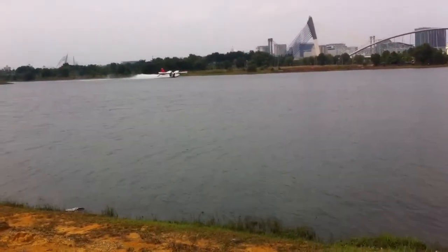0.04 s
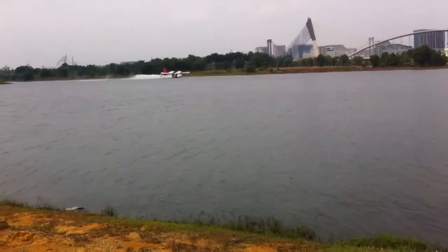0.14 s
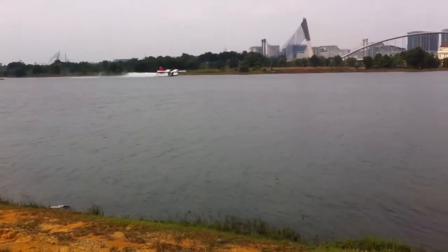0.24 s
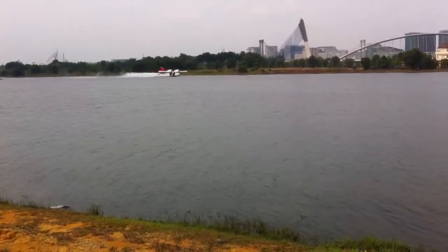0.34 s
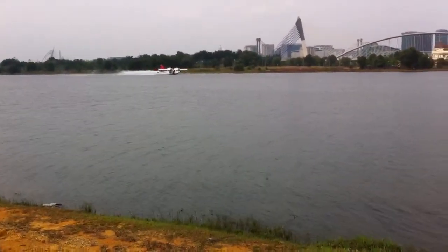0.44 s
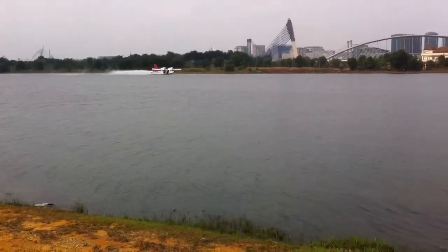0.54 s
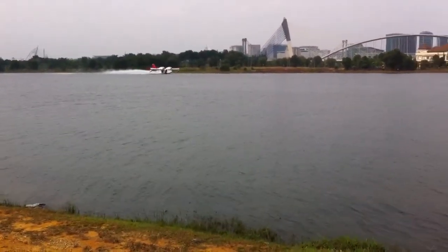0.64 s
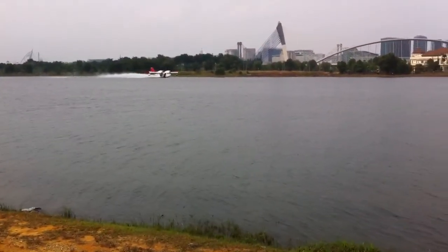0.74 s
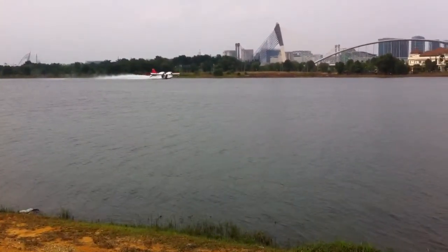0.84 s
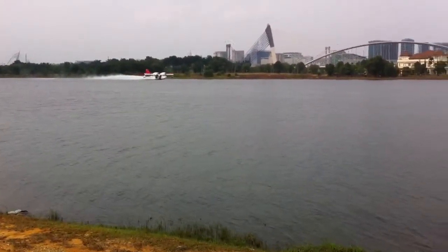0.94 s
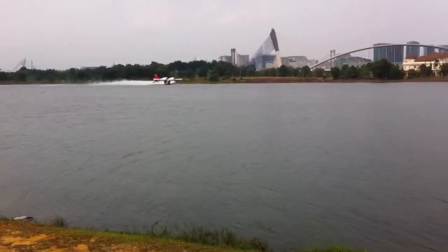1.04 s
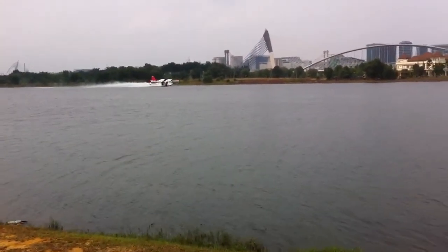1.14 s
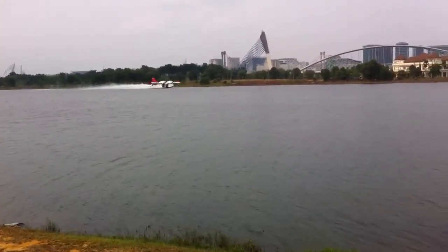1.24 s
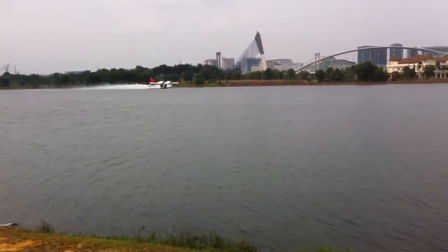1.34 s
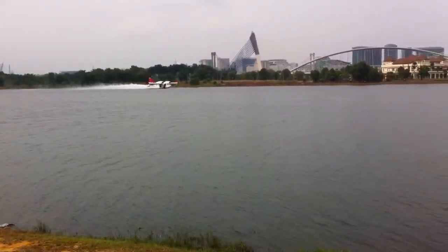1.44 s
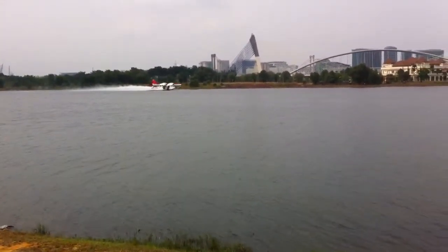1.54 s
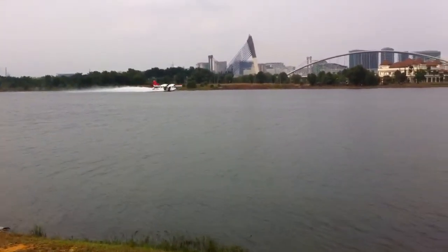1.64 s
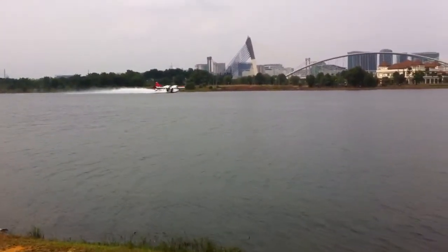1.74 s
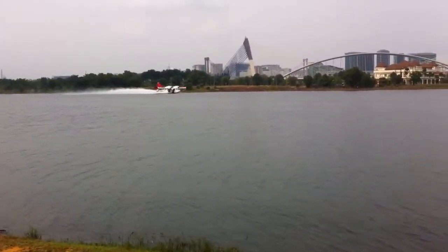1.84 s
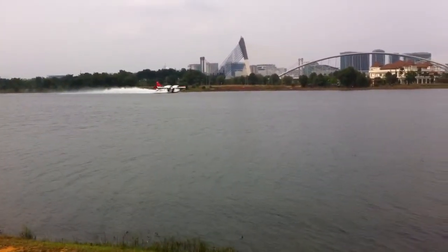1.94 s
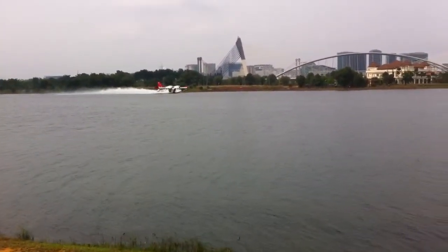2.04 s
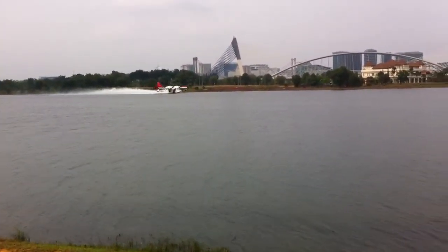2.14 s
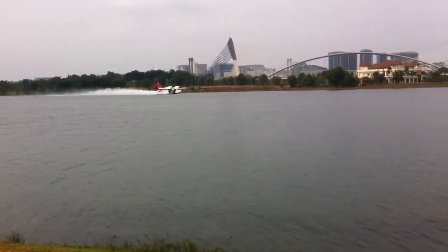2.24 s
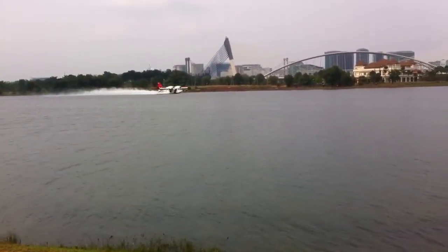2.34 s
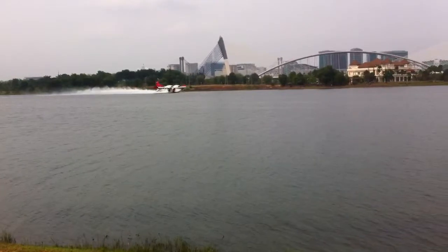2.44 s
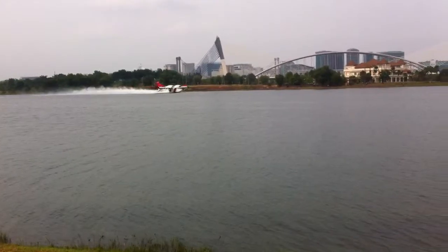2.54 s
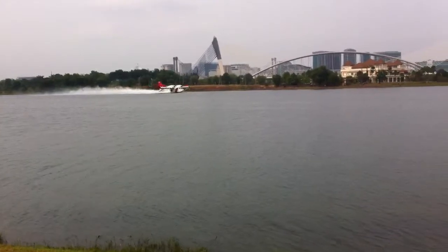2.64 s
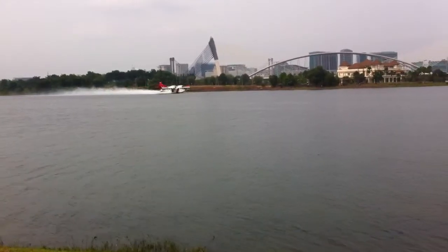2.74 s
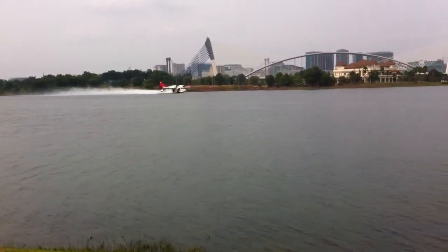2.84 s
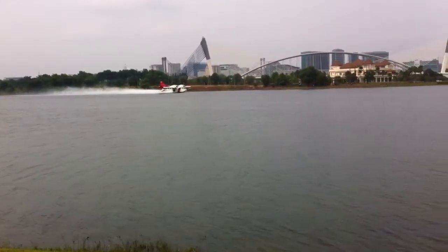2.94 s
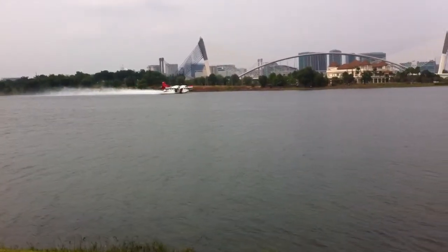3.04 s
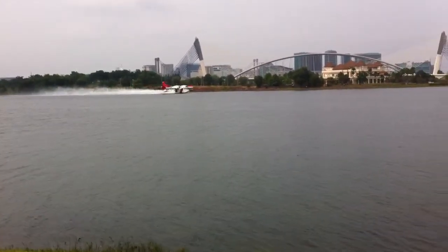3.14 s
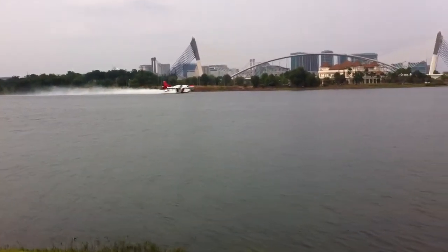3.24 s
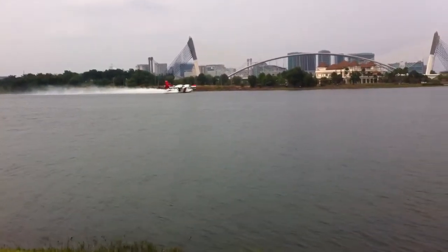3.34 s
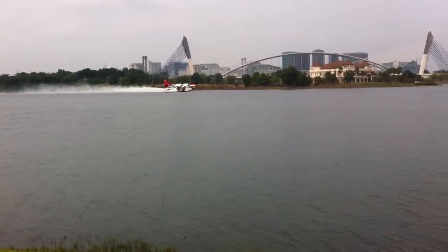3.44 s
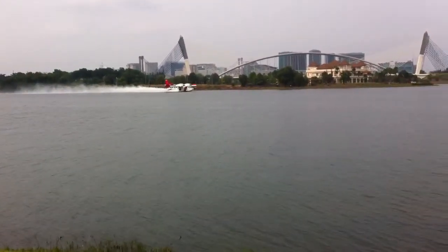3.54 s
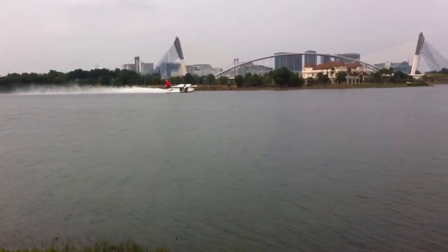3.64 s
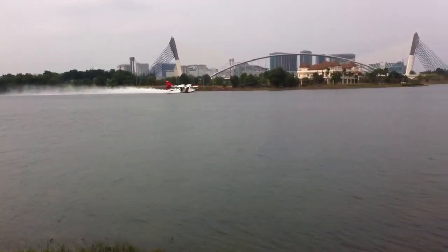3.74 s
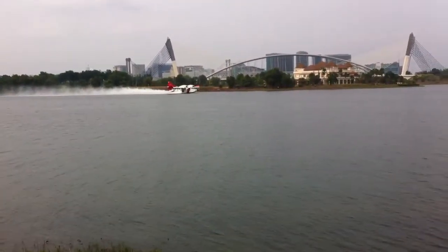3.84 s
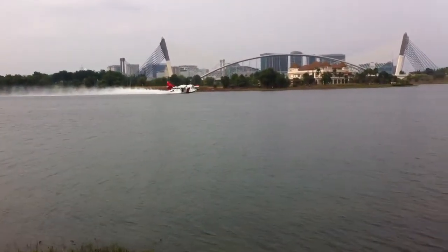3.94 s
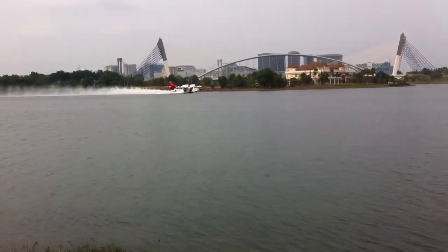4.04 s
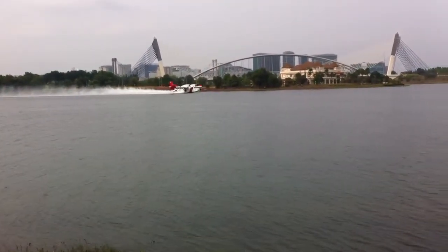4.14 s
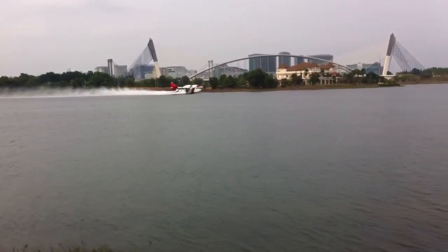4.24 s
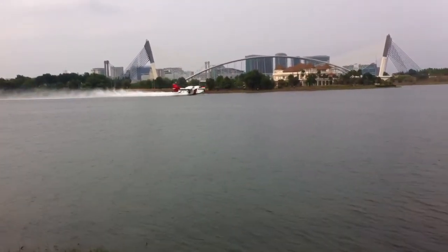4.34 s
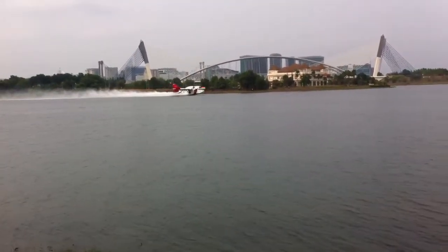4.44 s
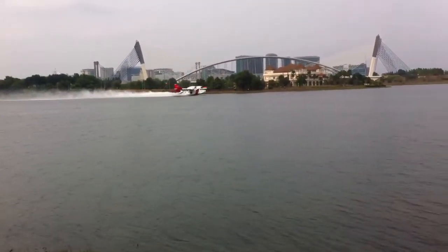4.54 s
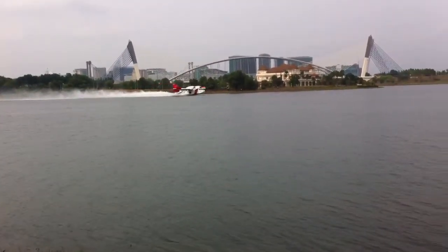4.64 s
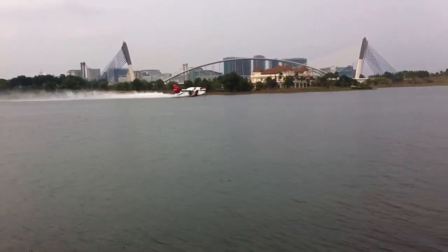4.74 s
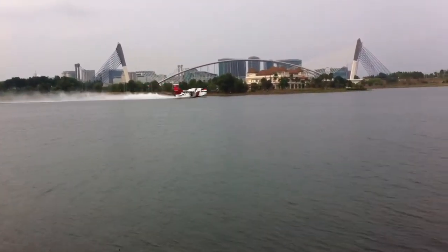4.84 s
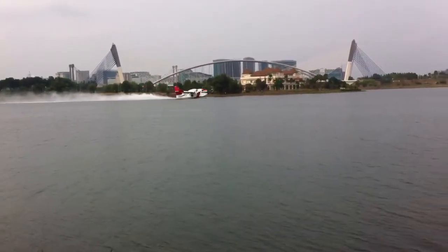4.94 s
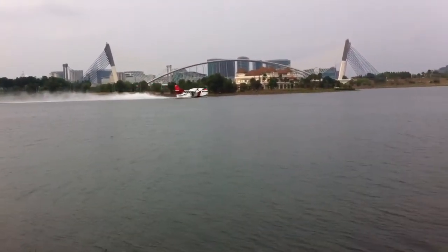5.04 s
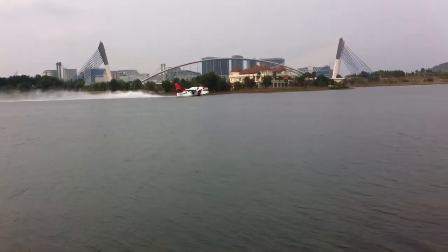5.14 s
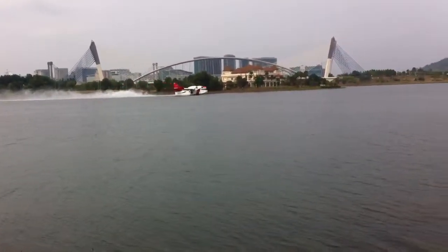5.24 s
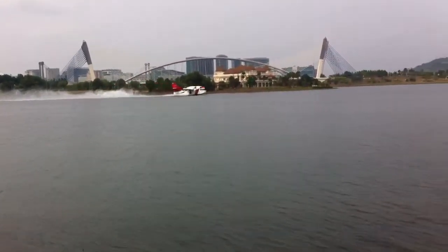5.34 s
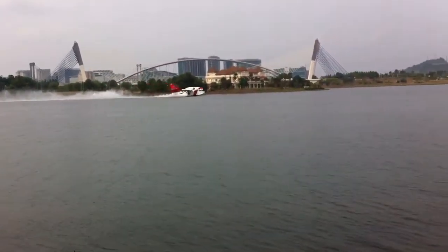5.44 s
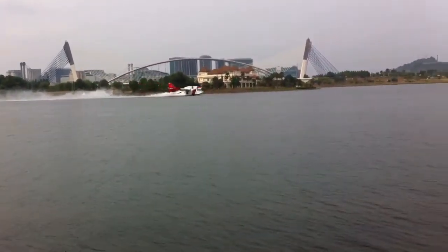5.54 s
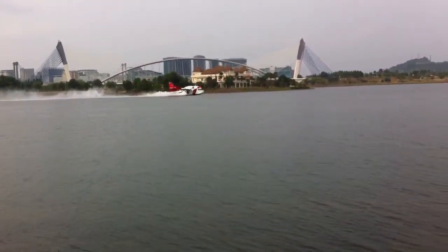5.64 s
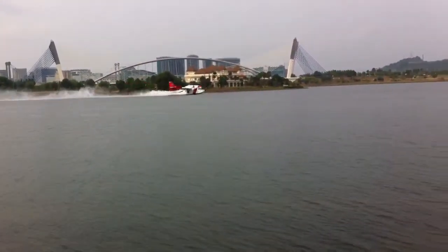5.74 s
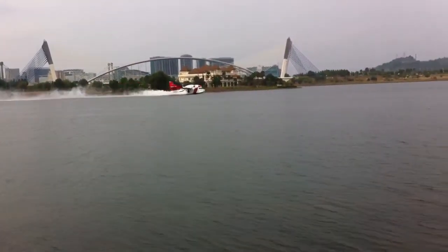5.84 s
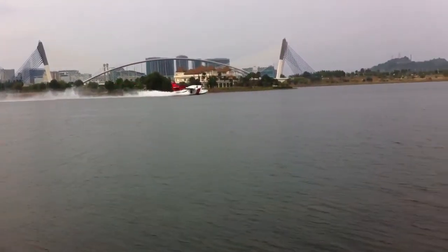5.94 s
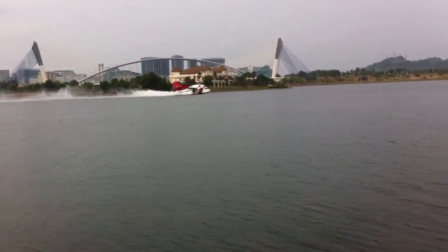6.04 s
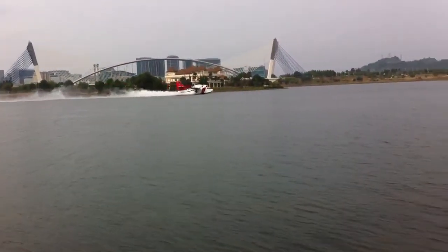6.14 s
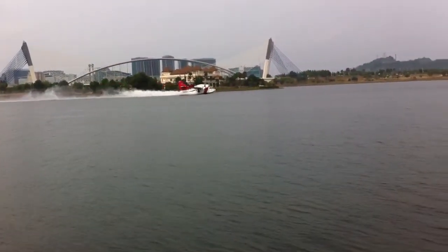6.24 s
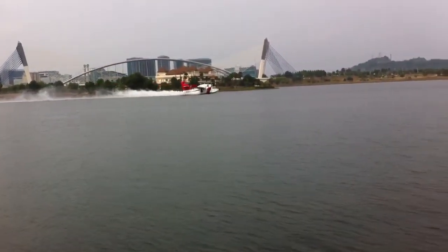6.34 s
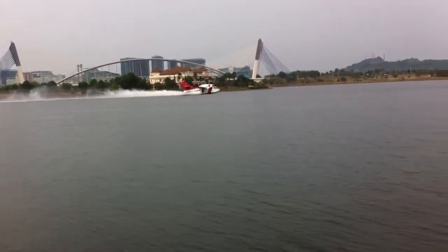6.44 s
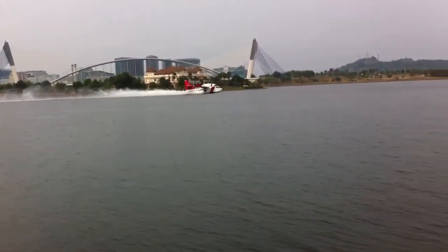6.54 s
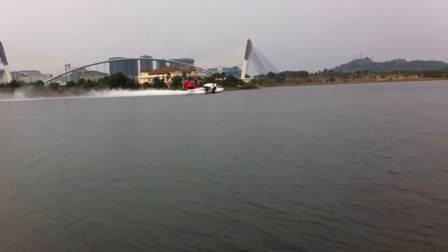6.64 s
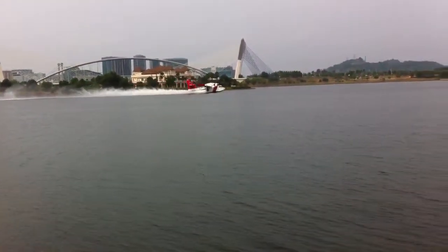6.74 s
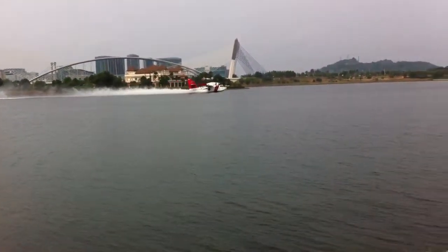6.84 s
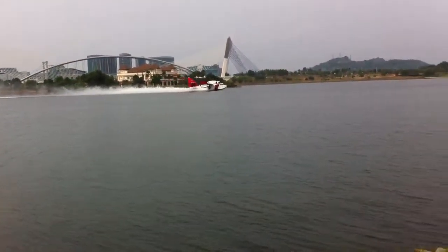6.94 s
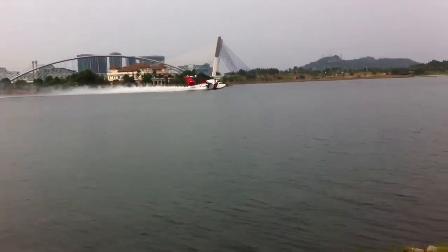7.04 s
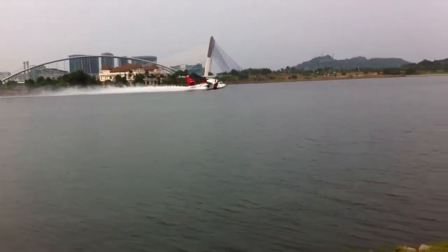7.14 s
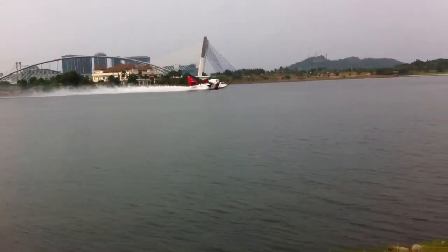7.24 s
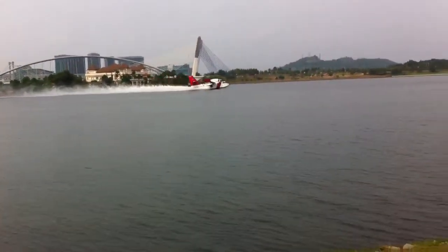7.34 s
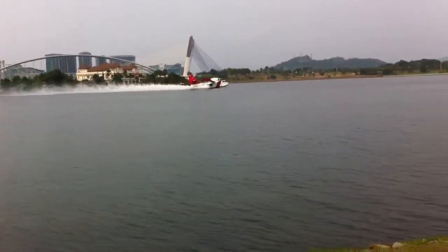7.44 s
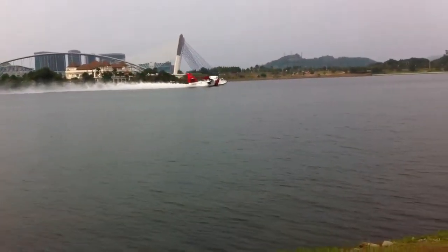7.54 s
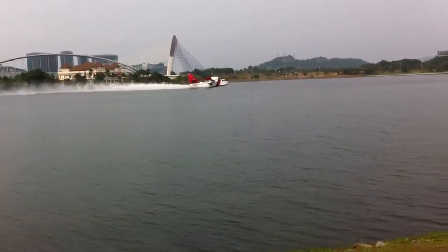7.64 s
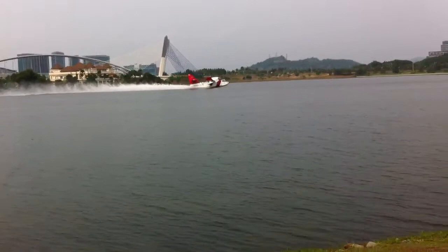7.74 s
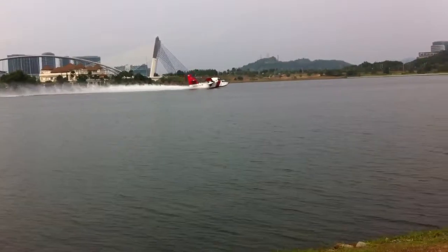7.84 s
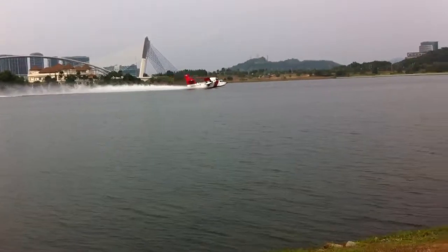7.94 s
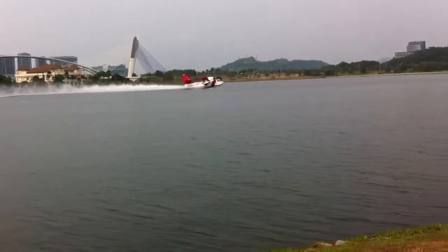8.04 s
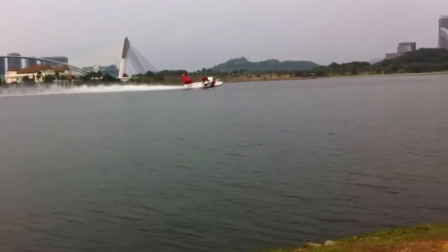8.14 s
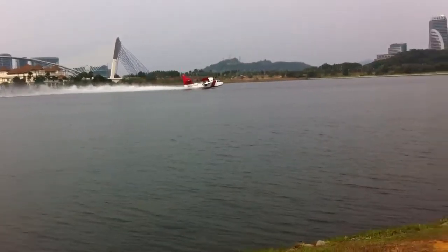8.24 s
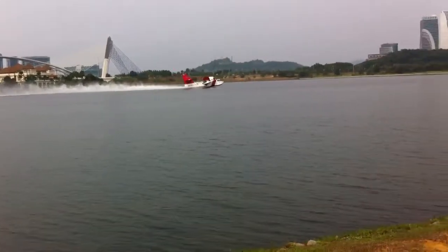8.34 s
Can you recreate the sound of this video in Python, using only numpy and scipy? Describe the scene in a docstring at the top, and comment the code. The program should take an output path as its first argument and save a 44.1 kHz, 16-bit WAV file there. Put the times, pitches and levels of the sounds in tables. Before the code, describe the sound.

A twin-engine propeller seaplane roars in the distance on a lake, while small waves rustle and a few faint chirps sound at the bank. The engines rise to take-off power, with a low throbbing drone, a high turbine whine and a hiss of exhaust and spray. Heard from the shore, the aircraft grows steadily louder and is loudest near the end, its pitch sagging slightly as it passes.

```python
"""First you hear a distant roar, small waves rustling, chirps at the bank and a wavering hum.
Then a twin-engined flying boat runs up to take-off power and skims across the lake. Its two
propellers drone and beat slowly, its turbines whine through the turning blades, and exhaust and
spray roar. Air over the water makes the tones and the treble swell and fade, and the ground
adds an echo. As the aircraft comes close, thin high ticks come and go."""
import sys
import numpy as np
from scipy import signal
from scipy.fft import rfft, irfft, next_fast_len
from scipy.io import wavfile
from scipy.ndimage import map_coordinates

SR = 44100
rng = np.random.default_rng(int(sys.argv[2]) if len(sys.argv) > 2 else 0)


def unload_wav(signal):
    """Save mono or channel-first audio to the path in sys.argv[1] as 16-bit WAV at rate SR, clipped to [-1, 1]."""
    wavfile.write(
        sys.argv[1],
        SR,
        np.round(np.clip(np.atleast_2d(signal).T, -1, 1) * 32767).astype(np.int16),
    )


N = 369999

# Faint airy hiss under everything: t/s, level/dB
AIR_LEVEL = [(0, -71), (4.5, -73), (8.39, -75)]
# Runs of high ticks: t/s, number of ticks, gap/s, level/dB
TICK_RUNS = [(4.565, 8, .0239, -67), (4.993, 1, .012, -61), (5.565, 1, .012, -60), (5.635, 3, .012, -57),
             (5.707, 1, .012, -59), (5.815, 2, .012, -64), (5.947, 2, .012, -61)]
# Soft sizzle around the ticks: t/s, level/dB
SIZZLE_LEVEL = [(0, -98), (4.2, -87), (4.5, -79), (4.68, -71), (4.85, -74), (5.1, -80), (5.35, -68),
                (5.7, -68), (5.95, -70), (6.15, -74), (6.5, -70), (6.8, -76.5), (8.39, -82.5)]
# Chirps at the bank: t/s, length/s, start f/Hz, end f/Hz, level/dB
BANK_CHIRPS = [(0.032, .05, 3300, 3000, -51), (0.104, .07, 2600, 2480, -52), (.15, .04, 3750, 3850, -53),
               (0.243, .07, 2600, 2610, -54), (.25, .04, 2950, 2850, -53), (.325, .035, 2650, 2500, -53),
               (0.335, .05, 3300, 3300, -51), (0.577, .02, 3300, 3300, -57), (.66, 0.052, 2880, 2880, -53),
               (0.668, 0.033, 4300, 4400, -54), (0.71, .03, 2470, 2630, -47), (0.753, .05, 4600, 4520, -55),
               (.78, 0.052, 2830, 2880, -56)]
# The opening hum, before its fade-out: t/s, f/Hz, level/dB
HUM_TONE = [(0.0, 253.5, -48), (0.306, 254.6, -44), (0.59, 247, -54), (0.61, 255, -66), (0.738, 255.6, -41),
            (0.86, 267, -53), (1.0, 247, -49)]
# Small waves, before their fade-out: t/s, level/dB
WAVE_LEVEL = [(0, -43), (.15, -44), (.22, -50), (.27, -49), (.36, -46), (.42, -48), (.58, -46), (.63, -44),
              (.7, -45), (.77, -47), (.82, -45), (.92, -53), (1.3, -46.5), (1.9, -45), (2.2, -61)]
# Tone colour of the waves: f/Hz, level/dB
WAVE_SPECTRUM = [(1200, -8), (2000, -18), (2600, 3.5), (3300, 4), (3900, -3), (4500, -7.5), (6000, -13)]
# Edges of the wave bands that swell separately: f/Hz
WAVE_BAND_EDGES = [1200, 2000, 2400, 2800, 3200, 3700, 4400, 6000]
# Echo off the soft ground: t/s, delay/ms, strength (0-1)
ECHO_PATH = [(0, 2.85, .2), (4, 2.82, .2), (5.5, 2.85, .36), (6.6, 2.86, .36), (7.2, 2.94, .25),
             (8.39, 2.96, .2)]
# Edges of the band that the grass sends back: f/Hz
ECHO_BAND = [1950, 4200]

# The run past the bank: t/s, roar level/dB, closeness (0-1), flutter level/dB
TAKE_OFF_RUN = [(0, -42.5, 0.17, -68), (.7, -40.5, 0, -57), (1.3, -38, 0, -40), (2, -35.5, 0.05, -41),
                (2.6, -34, 0.14, -41.5), (3.3, -32, 0.22, -41), (4, -32, 0.61, -38.5),
                (4.6, -30.5, 0.45, -39), (5.1, -29.5, 0.48, -34), (5.6, -29.5, 0.97, -31),
                (6.1, -28.5, 0.98, -41), (6.7, -29, 1, -30), (7.2, -28, 0.95, -37),
                (7.8, -29.5, 0.99, -30.5), (8.39, -28.5, 0.76, -47)]
# Tone colour of the roar from afar: f/Hz, level/dB
FAR_ROAR_SPECTRUM = [(20, -33.5), (60, -38), (90, -16), (125, -2.5), (190, 2.5), (260, -5.5), (298, -10.5),
                     (446, -8), (540, -12), (634, -20.5), (975, -25), (1350, -27), (1950, -61)]
# Tone colour of the roar from close by: f/Hz, level/dB
NEAR_ROAR_SPECTRUM = [(20, -42), (60, -25.5), (113, -6.5), (190, 3.5), (275, -5), (350, -1), (412, -0.5),
                      (470, -4.5), (520, -8.5), (610, -15), (745, -6), (880, -9.5), (985, -16),
                      (1090, -15.5), (1250, -24), (1950, -27.5)]
# Raspy exhaust bands, against the hiss: t/s, main f/Hz, main level/dB, lower band level/dB
RASP_BANDS = [(0, 2305, -30, -28), (3.8, 2310, -27, -28), (4.5, 2280, -14, -17), (5.5, 2240, -23, -22),
              (5.9, 2225, -16, -14), (6.3, 2234, -14, -13), (6.65, 2195, -9, -8), (6.9, 2163, -9.5, -17),
              (7.2, 2135, -11, -13), (7.5, 2120, -10.5, -8.5), (7.9, 2081, -15.5, -15),
              (8.39, 2060, -17, -16)]
# Tone colour of the jet hiss: f/Hz, level/dB
HISS_SPECTRUM = [(700, 4.5), (1250, -3.5), (1390, -1), (1600, 0.5), (1950, 0.5), (2190, -0.5), (2400, -0.5),
                 (2550, -1.5), (2700, -3), (2900, -1.5), (5500, -5.5), (6800, -7), (8000, -13.5),
                 (9500, -18), (10500, -35), (13000, -53)]
# Change in the highest hiss, which the air soaks up from afar: t/s, level/dB
HISS_TOP_CHANGE = [(0, -15), (1.5, -5), (2.5, -3), (3.5, 0), (4.5, 1), (5.3, 2), (5.6, -1), (6.5, 1),
                   (7, 5), (7.3, 6), (7.6, 6), (7.8, 8), (8.1, 6), (8.39, 5)]
# Treble carried by the unsteady air: t/s, hiss level/dB, whine level/dB
TREBLE_LEVELS = [(0, -49.5, -59.5), (.8, -51, -57), (1.3, -53, -53), (1.9, -50, -52), (2.27, -51.5, -53),
                 (2.45, -47.5, -52), (3.1, -48.5, -52.5), (3.35, -48, -53), (3.6, -46.5, -48.5),
                 (4.1, -47.5, -49), (4.7, -46.5, -49.5), (5.15, -39.5, -42.5), (5.3, -42.5, -45),
                 (5.4, -38, -39), (5.49, -34, -37.5), (5.58, -36, -41), (5.76, -36.5, -46.5),
                 (5.93, -34.5, -38), (6.1, -37.5, -44), (6.3, -37, -39), (6.57, -37, -44.5),
                 (6.68, -40.5, -44.5), (7.03, -39, -43), (7.12, -37.5, -46), (7.2, -39.5, -42.5),
                 (7.31, -39.5, -43), (7.42, -39, -43), (7.62, -39.5, -40.5), (7.8, -37.5, -40),
                 (7.92, -39, -43), (8.1, -39.5, -44), (8.39, -46, -45.5)]
# Compressor tones: t/s, mean f/Hz, gap between the engines/Hz, phase swing from the blades/rad
WHINE_TONES = [(0, 6170, 90.3, 0.65), (.5, 6270, 130.2, 0.83), (1.1, 6500, 150.4, 1),
               (1.6, 6780, 239.3, 1.3), (2.05, 7100, 130, 1.1), (2.6, 7260, 90, .9),
               (3.2, 7320, 84.5, 0.92), (3.9, 7350, 85.1, 0.6), (4.8, 7280, 84, 0.76),
               (5.5, 7290, 84.7, 0.79), (6.5, 7170, 82.5, 1.5), (7.0, 7150, 82.3, 1.3),
               (7.4, 7110, 81.85, 2.4), (7.75, 7100, 82.35, 4.2), (8.05, 7070, 81.9, 2.1),
               (8.39, 7000, 80.7, 2.1)]
# Brief flare-ups of the whine: t/s, added level/dB
WHINE_FLARES = [(.96, 4), (1.19, 6.5), (1.37, 7), (1.98, 4.5), (2.44, 4), (2.87, 4), (3.04, 8), (3.16, 9),
                (3.411, 1), (3.78, 2), (3.9, 5.5), (4.95, 3.5), (5.07, 5), (5.49, 4), (5.93, 0), (6.23, 2),
                (6.43, 3), (6.96, 5), (7.12, 8), (7.3, 4.5), (7.41, 6), (7.54, 7), (7.7, 3.5), (7.8, 3),
                (7.97, 4), (8.079, 7), (8.2, 2)]

# Brief surges and dips of the drone: t/s, added level/dB
DRONE_THROBS = [(1.44, 4), (1.78, -5.5), (2.21, 9), (2.3, -11), (2.47, 2.5), (2.65, -6), (2.97, -1),
                (3.07, 5.5), (3.35, -6), (3.49, -2), (3.71, 3.5), (3.86, 1), (3.931, 8), (3.97, -8),
                (4.21, 2.5), (4.35, -6), (4.42, 0.5), (4.52, -9), (4.64, -9), (4.82, 2.5), (4.92, -1),
                (5.23, -8), (5.31, 2.5), (5.38, -9), (5.53, 0.5), (5.72, 1), (5.98, -2)]
# Edges of the band that throbs: f/Hz
THROB_BAND = [120, 220]
# How often a blade passes; tone 2 is twice this pitch, and so on: t/s, f/Hz
BLADE_PASSES = [(0.0, 74.2), (0.6, 75.2), (0.9, 76.8), (1.2, 80.4), (1.5, 81.44), (2.1, 87.4), (2.4, 86.8),
                (2.7, 85.14), (3.9, 85.2), (4.2, 84.15), (4.8, 83.54), (5.7, 83.8), (6.6, 83.07),
                (7.2, 82.0), (7.6, 81.95), (8.4, 80.96)]
# The lowest blade tone: t/s, level/dB
FIRST_TONE_LEVEL = [(0, -64), (1.3, -59), (1.5, -52), (1.66, -55), (1.9, -38), (2.3, -37), (2.62, -46.5),
                    (2.9, -42.5), (3.1, -50.5), (3.85, -35), (4.4, -42.5), (5.1, -43), (5.35, -51.5),
                    (5.85, -37.5), (6, -39.5), (6.2, -33), (6.45, -46), (6.58, -41), (6.73, -53),
                    (6.95, -41), (7.65, -43), (7.87, -49), (8.1, -41), (8.39, -49)]
# Both propellers: t/s, lead of one over the other/blade passes, level/dB for each of tones 2 to 6
PAIRED_TONES = [(0, -1.46, -71, -55, -76, -72, -94), (1.5, -1.27, -40, -49, -57, -57, -63),
                (2.05, -1.29, -30.5, -52, -51, -57, -60), (2.3, -1.2, -24.5, -40, -42, -53, -49),
                (2.48, -1.15, -28.5, -35, -48, -46, -57), (2.62, -1.02, -36, -49.5, -53, -49, -60),
                (3, -0.94, -41, -42, -51, -50, -48), (3.75, -1.02, -32, -47, -40, -43.5, -50),
                (4.05, -0.7, -31.5, -39.5, -41, -47, -46), (4.2, -0.58, -28.5, -48, -44, -56, -57),
                (4.6, -0.53, -24.5, -33.5, -50, -51, -53), (4.85, -0.3, -24.5, -35.5, -52, -53, -58),
                (4.97, -0.34, -28, -36, -58, -60, -50), (5.15, -0.288, -18, -40.5, -54, -61, -49),
                (5.4, -.26, -26, -33.5, -49, -48, -36.5), (5.55, -0.21, -14.5, -36, -38, -36.5, -50),
                (5.7, -0.16, -33, -41, -42, -27, -37), (5.95, -0.12, -33, -33, -30, -45, -48),
                (6.1, 0.0063, -23.5, -45, -35.5, -36, -41.5), (6.3, 0.063, -20, -32.5, -46, -50, -44),
                (6.47, 0.1, -20.5, -34, -38, -32, -35.5), (6.58, 0.025, -31.5, -34, -32.5, -38, -36),
                (6.8, 0.307, -20, -39, -29, -27.5, -46), (6.95, 0.4, -22, -29, -25.5, -33.5, -39),
                (7.1, 0.33, -12, -28.5, -28.5, -31.5, -35.5), (7.4, 0.41, -13, -32, -30.5, -41, -38),
                (7.55, 0.41, -11.5, -36.5, -27, -37, -45), (7.7, .49, -15.5, -28, -28, -40, -42),
                (7.85, 0.52, -15, -27.5, -32.5, -31, -39), (8, 0.6, -16, -28, -33, -32.5, -46),
                (8.2, 0.72, -17, -23.5, -31, -34.5, -41.5), (8.39, .81, -13, -26.5, -30.5, -38, -43)]
# Tones 4 to 6: tone number, second propeller's strength against the first, steadiness
MIDDLE_TONES = [(4, 0.7, 6), (5, 0.24, 6), (6, 4, 6)]
# Higher tones: tone number, level/dB against the roar when closest
HIGH_TONES = [(7, -25), (8, -21), (9, -17), (10, -21), (11, -26), (13, -32)]


def from_db(db):
    """Turn decibels into a number to multiply by."""
    return 10 ** (np.asarray(db) / 20)


def rms_one(x):
    """Scale a signal so that its average strength (rms) is 1."""
    return x / np.sqrt(np.mean(np.abs(x) ** 2) + 1e-20)


def in_time(rows):
    """Join a table's rows with straight lines: one curve for each column after the time."""
    times, *columns = np.transpose(rows)
    return [np.interp(np.arange(N) / SR, times, column) for column in columns]


def phase_of(hz):
    """The angle, in radians, that a tone with this changing pitch has turned through."""
    return 2 * np.pi * np.cumsum(hz) / SR


def bump(at_s, width_s):
    """A smooth bell shape of height 1; width_s is its half-width."""
    return np.exp(-((np.arange(N) / SR - at_s) / width_s) ** 2 / 2)


def butter(order, hz, kind="band"):
    """A filter that keeps a band of pitches, or with "high" everything above one pitch."""
    return signal.butter(order, hz, kind, fs=SR, output="sos")


def drift(rate_hz):
    """Smoothed noise that wanders up and down by about 1."""
    step, settle = 25, 4000   # samples per random value; values skipped while the filter settles
    pole = np.exp(-2 * np.pi * step * rate_hz / SR)
    white = rng.standard_normal(N // step + settle + 2)
    slow = signal.lfilter([1], [1, -2 * pole, pole * pole], white)[settle:]
    return np.interp(np.arange(N) / step, np.arange(len(slow)), rms_one(slow))


def scattered(rate_hz, steady=0):
    """Swirling air shakes a tone's level and phase; the larger steady is, the less it shakes."""
    return rms_one(steady + drift(rate_hz) + 1j * drift(rate_hz))


def coloured(white, spectrum):
    """Give noise the tone colour in a table, at strength 1."""
    hz, db = np.transpose(spectrum)
    size = next_fast_len(N)
    log_hz = np.log(np.fft.rfftfreq(size, 1 / SR) + 1)
    gain = from_db(np.interp(log_hz, np.log(hz), db, left=-90, right=-90))
    return rms_one(irfft(rfft(np.resize(white, size)) * gain, size)[:N])


def ticks():
    """Tiny puffs of high noise, each a little stronger or weaker, on a grainy sizzle."""
    loudness = from_db(in_time(SIZZLE_LEVEL)[0] + 2 * drift(60))
    for start_s, count, gap_s, db in TICK_RUNS:
        for k in range(round(count)):
            loudness += from_db(db + rng.normal(0, 1.5)) * bump(start_s + k * gap_s, width_s=.001)
    return loudness * rms_one(signal.sosfilt(butter(3, hz=[9800, 11600]), rng.standard_normal(N)))


def chirps():
    """Something at the bank gives short, hoarse, sliding whistles."""
    out, hoarse = np.zeros(N), scattered(120, steady=.3)
    for start_s, length_s, start_hz, end_hz, db in BANK_CHIRPS:
        size, at = round(length_s * SR), round(start_s * SR)
        slide = phase_of(np.linspace(start_hz, end_hz, size))
        whistle = np.real(hoarse[at:at + size] * np.exp(1j * slide))
        out[at:at + size] += from_db(db) * np.hanning(size) ** .5 * whistle
    return out


def fade_out(end_s, length_s):
    """A gain that stays at 1, then slides down to reach 0 at end_s."""
    return np.clip((end_s - np.arange(N) / SR) / length_s, 0, 1)


def hum():
    """A low hum wavers and dies away."""
    hz, db = in_time(HUM_TONE)
    tone = scattered(7.2, steady=2.9) * np.exp(1j * phase_of(hz))
    return from_db(db) * np.sqrt(2) * np.real(tone) * fade_out(HUM_TONE[-1][0], length_s=.35)


def waves():
    """Small waves rustle in the reeds: grainy noise in bands that each swell on their own."""
    grains = rng.standard_normal(N) * from_db(.85 * drift(40) + .4 * drift(6.6))
    rustle = coloured(grains, WAVE_SPECTRUM)
    patches = sum(from_db(1.5 * drift(8.4)) * signal.sosfilt(butter(2, band), rustle)
                  for band in zip(WAVE_BAND_EDGES, WAVE_BAND_EDGES[1:]))
    return from_db(in_time(WAVE_LEVEL)[0]) * patches * fade_out(WAVE_LEVEL[-1][0], length_s=1)


def with_ground_echo(sound):
    """A slightly late copy bounces off the ground, lifting some pitches and weakening others."""
    delay_ms, strength = in_time(ECHO_PATH)
    turn_rad = 2.12   # the bounce shifts the phase
    turned = np.real(signal.hilbert(sound, next_fast_len(N))[:N] * np.exp(1j * turn_rad))
    dulled = signal.sosfiltfilt(butter(2, ECHO_BAND), turned)
    delay_samples = (delay_ms + .012 * drift(3)) * SR / 1000   # the path wavers a little
    echo = map_coordinates(dulled, [np.arange(N) - delay_samples], order=3, mode="reflect")
    return sound + strength * echo


def roar(roar_db, near):
    """Exhaust and rushing air make a low noise that brightens as the aircraft comes close."""
    white = rng.standard_normal(N)
    noise = (1 - near) * coloured(white, FAR_ROAR_SPECTRUM) + near * coloured(white, NEAR_ROAR_SPECTRUM)
    return from_db(roar_db + .37 * drift(2.8)) * noise


def exhaust_rasp(blade_angle):
    """Three narrow bands of exhaust noise, chopped by the blades, slide down as the aircraft passes."""
    main_hz, main_db, lower_db = in_time(RASP_BANDS)
    bands = sum(from_db(db) * scattered(rate_hz=82) * np.exp(1j * pitch_ratio * phase_of(main_hz))
                for db, pitch_ratio in [(main_db, 1), (lower_db, .64), (lower_db - 7.5, 1.66)])
    return np.sqrt(2) * np.real(bands) * (1 + .22 * np.cos(blade_angle))


def jet_hiss(blade_angle, hiss_db):
    """The exhaust jets hiss and rasp, pulsing a little with each passing blade."""
    hiss = coloured(rng.standard_normal(N), HISS_SPECTRUM)
    top = signal.sosfiltfilt(butter(3, hz=8200, kind="high"), hiss)
    hiss += (from_db(in_time(HISS_TOP_CHANGE)[0]) - 1) * top + exhaust_rasp(blade_angle)
    chop = 1 + .094 * np.cos(blade_angle + drift(.72))
    return from_db(hiss_db + .74 * drift(10.4)) * hiss * chop


def turbine_whine(blade_angle, near, whine_db):
    """Each engine's compressor sings one high, flickering tone, chopped by the passing blades."""
    flicker_db = drift(rate_hz=25)
    flare_db = sum(db * bump(at_s, width_s=.019) for at_s, db in WHINE_FLARES)
    mean_hz, gap_hz, swing_rad = in_time(WHINE_TONES)
    spin, apart = phase_of(mean_hz), phase_of(gap_hz)
    tones = 0
    for side in (-.5, .5):   # one engine below the mean pitch, one above
        lag = rng.uniform(0, 2 * np.pi) + drift(.78)
        blade = np.sin(blade_angle + lag)
        chop = (1 + .5 * blade) * np.exp(1j * swing_rad * blade)   # adds tones a blade rate apart
        # The sound is rougher from afar.
        path = near * scattered(13, steady=.8) + (1 - near) * scattered(38, steady=.6)
        tones += path * chop * np.exp(1j * (spin + side * apart))
    # Swirling intake air smears the tone downwards.
    smear = scattered(730) * np.exp(1j * .973 * spin) * (1 + .097 * np.cos(blade_angle))
    smear_share = .27 + .17 * near
    whine = np.sqrt(1 - smear_share) * rms_one(tones) + np.sqrt(smear_share) * smear
    return from_db(whine_db + flicker_db + flare_db) * np.sqrt(2) * np.real(whine)


def with_throb(sound):
    """The band around the strongest blade tone briefly surges and dips."""
    change_db = sum(db * bump(at_s, width_s=.016) for at_s, db in DRONE_THROBS)
    band = signal.sosfiltfilt(butter(2, THROB_BAND), sound)
    return sound + (from_db(change_db) - 1) * band


def beating(number, lead, partner):
    """Two propellers add up to 1 in step and partly cancel out of step; partner is the second's share."""
    return (1 + partner * np.exp(2j * np.pi * number * lead)) / (1 + partner)


def propellers(blade_angle, near, roar_db, flutter_db):
    """Passing blades push the air, making a drone of tones at whole multiples of the blade rate."""
    lead, second_db, third_db, *middle_dbs = in_time(PAIRED_TONES)
    gains = [from_db(in_time(FIRST_TONE_LEVEL)[0]),
             from_db(second_db) * beating(2, lead, partner=.72),
             from_db(third_db) * beating(3, lead, partner=.39)]
    for db, (number, partner, steady) in zip(middle_dbs, MIDDLE_TONES):
        gains.append(from_db(db) * beating(number, lead, partner) * scattered(2, steady))
    drone = 0
    for number, gain in enumerate(gains, 1):
        shake = 1 + number * (.09 - .072 * near) * scattered(11.6)   # stronger from afar
        start_angle = 2 * np.pi * rng.random()
        drone += gain * shake * np.exp(1j * (number * blade_angle + start_angle))
    for number, db in HIGH_TONES:
        fading = scattered(1.45, steady=.72)
        drone += from_db(roar_db + db) * near * fading * np.exp(1j * number * blade_angle)
    # Waves and shores scatter the strongest tone into a rough flutter close to tone 2.
    flutter = from_db(flutter_db + drift(4.6)) * scattered(21.3) * np.exp(2.06j * blade_angle)
    return np.sqrt(2) * np.real(drone + flutter)


def scene():
    """Mix the aircraft and the sounds at the bank into one channel."""
    blade_angle = phase_of(in_time(BLADE_PASSES)[0])   # one full turn per passing blade
    roar_db, near, flutter_db = in_time(TAKE_OFF_RUN)
    hiss_db, whine_db = in_time(TREBLE_LEVELS)
    drone = propellers(blade_angle, near, roar_db, flutter_db)
    bass = with_throb(drone + roar(roar_db, near)) + hum()
    treble = turbine_whine(blade_angle, near, whine_db) + jet_hiss(blade_angle, hiss_db) + waves()
    return (bass + with_ground_echo(treble) + chirps() + ticks())[None]


def record(dry):
    """Add a faint airy hiss and cut away the very highest treble."""
    cutoff_hz = 15950
    noisy = dry + from_db(in_time(AIR_LEVEL)[0]) * rng.standard_normal(dry.shape)
    return signal.sosfilt(signal.cheby2(22, 70, cutoff_hz, fs=SR, output="sos"), noisy)


dry = scene()
out = record(dry)
unload_wav(out)
```